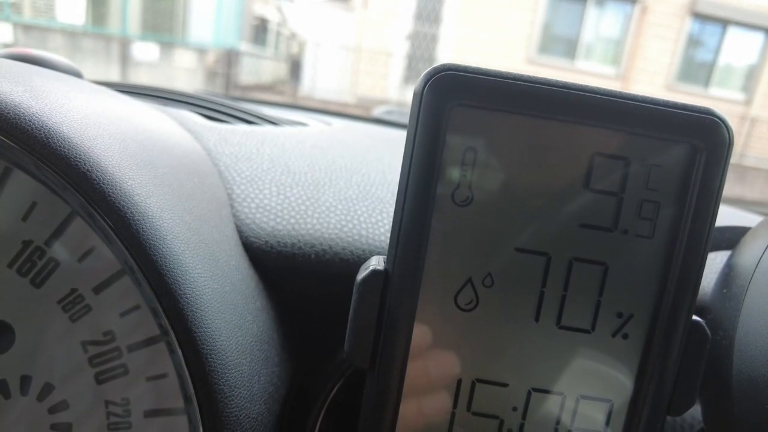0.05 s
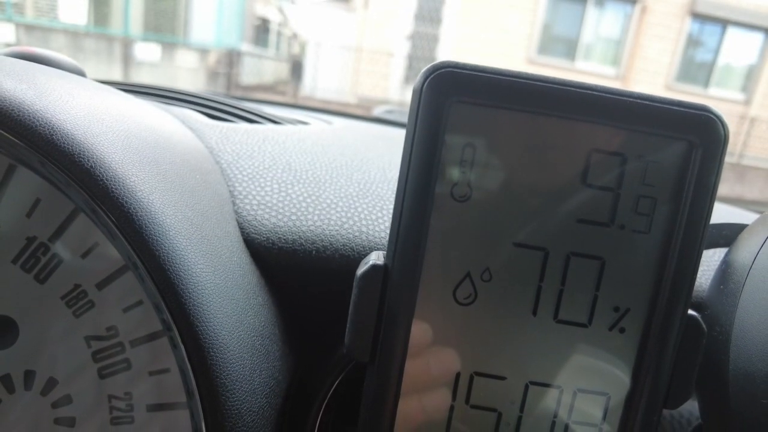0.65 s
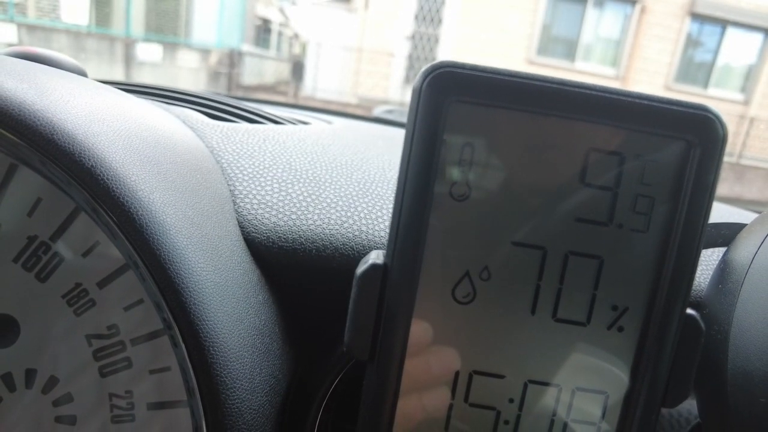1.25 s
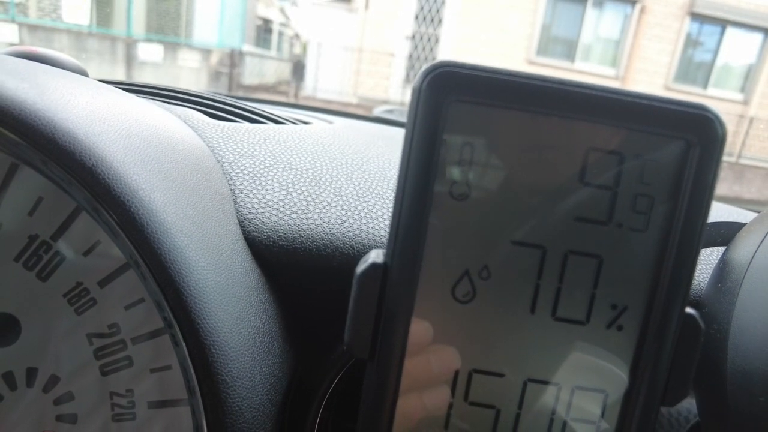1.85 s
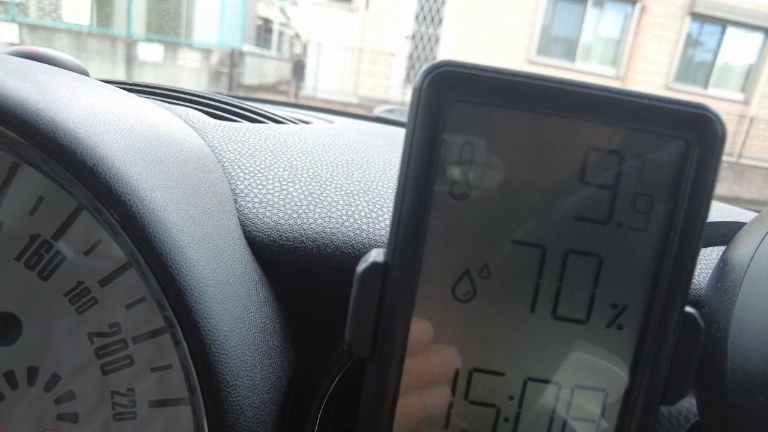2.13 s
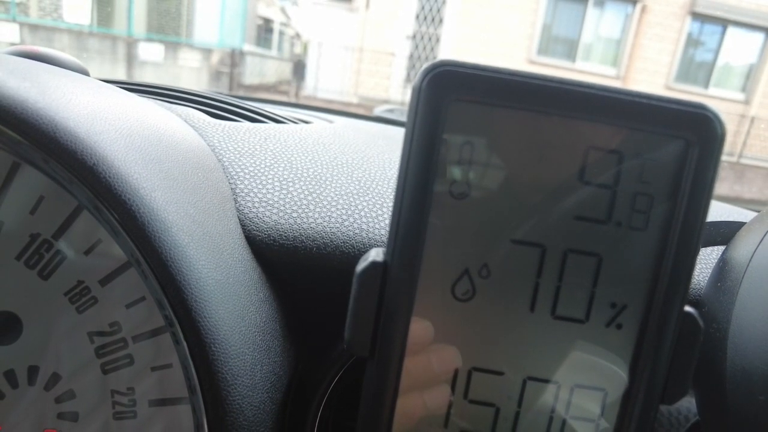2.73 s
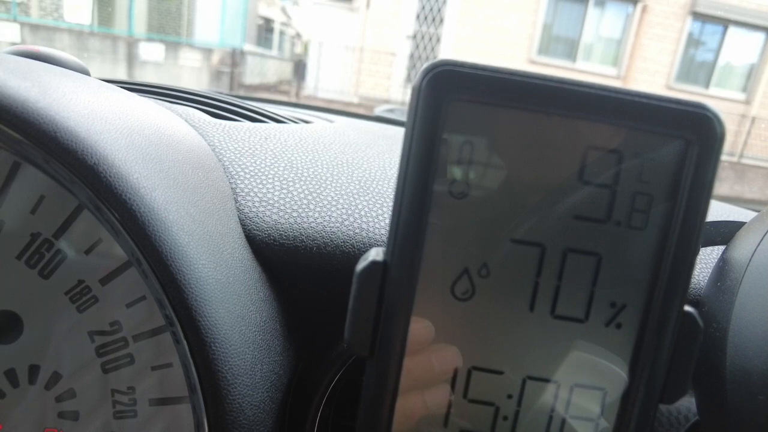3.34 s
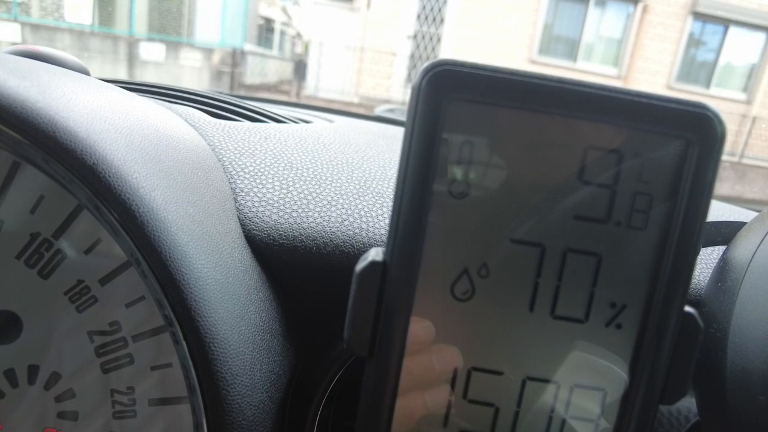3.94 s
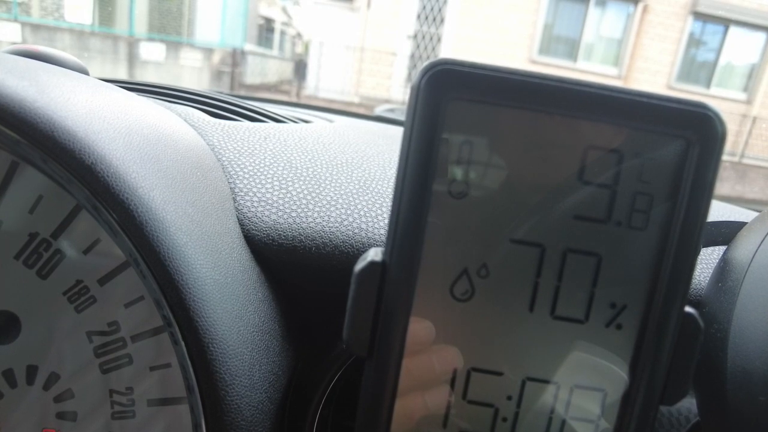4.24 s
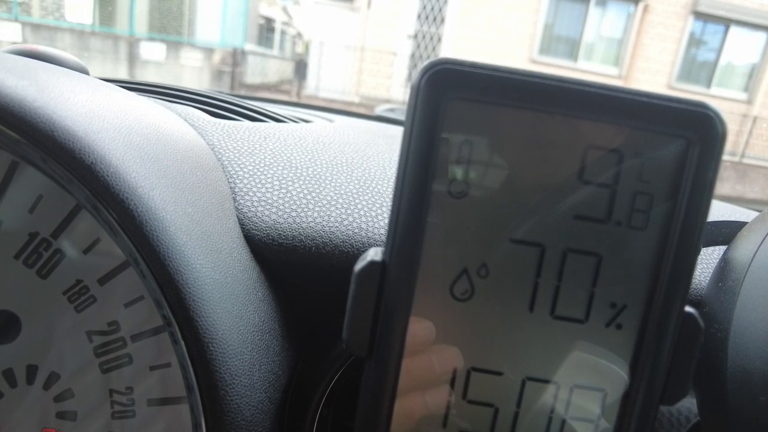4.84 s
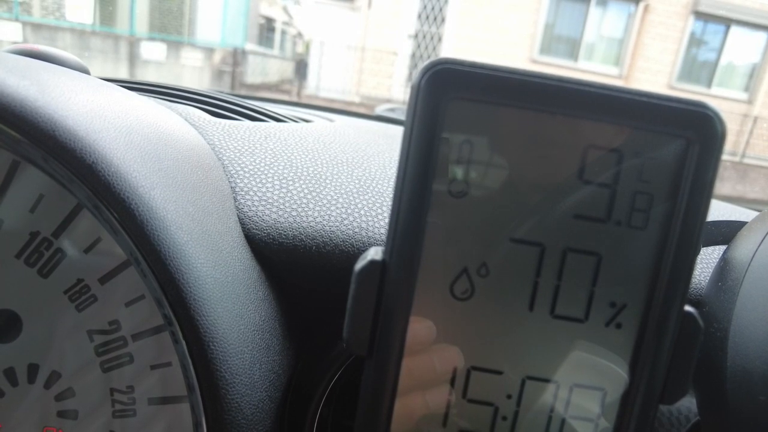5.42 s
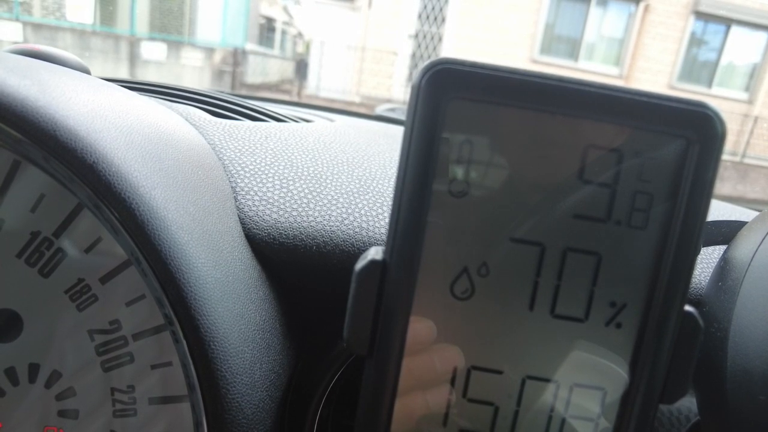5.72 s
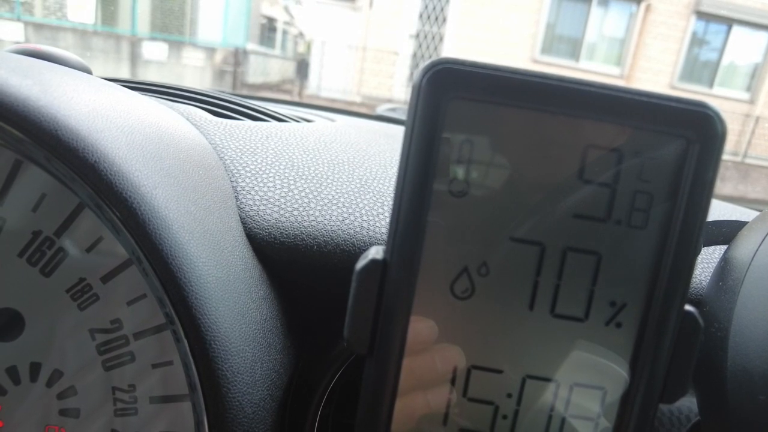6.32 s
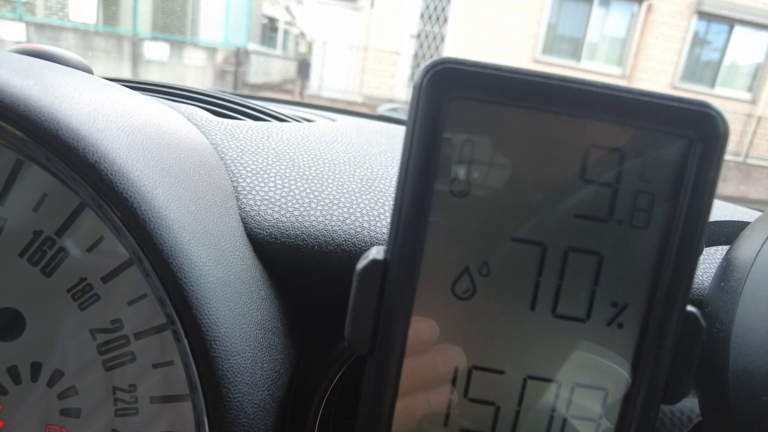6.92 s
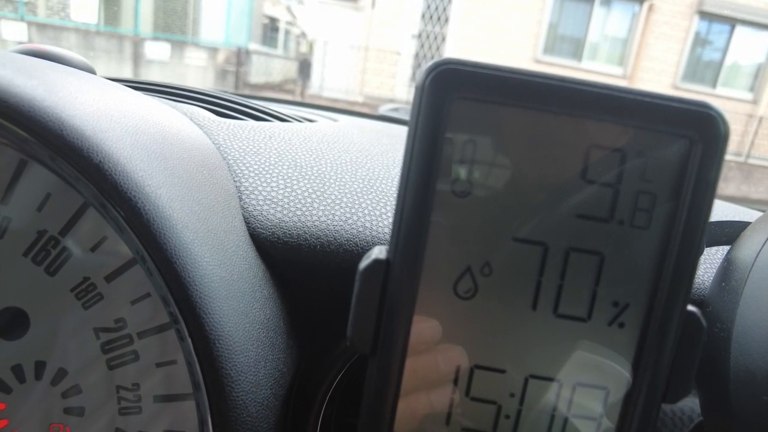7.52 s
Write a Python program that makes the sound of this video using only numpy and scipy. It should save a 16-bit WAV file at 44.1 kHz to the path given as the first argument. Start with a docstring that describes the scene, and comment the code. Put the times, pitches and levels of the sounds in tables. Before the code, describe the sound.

Steady air rushes and hisses from car vents, softly buffeting the microphone over the hum of the blower and idling engine.

```python
"""The air-conditioning blower of a parked car runs steadily, heard from close to the dashboard.
From the start, turbulent air rushes through resonant ducts into the cabin, its draught buffets the
microphone and the grilles hiss; beneath lie the blower's hum and the low note of the idling engine.
From about half a second on, gusts and soft, low thumps come and go in the rumble as the draught builds
slightly. Near six seconds the trim gives one faint tick, and the air runs on."""
import sys
import numpy as np
from scipy import signal
from scipy.fft import rfft, irfft, next_fast_len
from scipy.io import wavfile
from scipy.ndimage import uniform_filter1d

SR = 44100
rng = np.random.default_rng(int(sys.argv[2]) if len(sys.argv) > 2 else 0)


def file_out(sig):
    """Save sig as 16-bit WAV at sys.argv[1]."""
    # one column per channel
    cols = np.atleast_2d(sig).T
    # limit, then scale
    lim = np.clip(cols, -1, 1)
    pcm = np.round(lim * 32767).astype(np.int16)
    wavfile.write(sys.argv[1], SR, pcm)


N = 338247

# Spectrum of the air in the ducts: frequency_hz, relative_db
DUCT_SPECTRUM = [(10, -33), (24, -13), (60, -2.5), (160, -2), (300, -2), (430, -3.5), (480, -11),
                 (800, -8.5), (1050, -10), (1350, -14.5), (1550, -23), (1950, -23), (2150, -27.5),
                 (2950, -29.5), (3110, -34.5), (3330, -48.5), (4500, -87)]
# Resonances and dips of the ducts and cabin: centre_hz, width_hz, gain_db
CABIN_MODES = [(185, 15, 2.5), (204.4, 19, 6), (258, 30, -1), (285, 24, 4), (324, 27, -2), (355, 15, 2.5),
               (374.5, 7.1, -3), (394, 13, 1), (422, 21, 2.5), (504, 55, 2), (566, 34, -3), (609, 14, 3.5),
               (882, 24, -2), (1084, 32, -7.5), (1136, 60, 2), (1225, 40, -2), (1435, 29, -2.5),
               (1502, 66, 4.5), (1624, 36, 4.5), (1718, 55, 5), (1790, 25, -1), (2320, 99, 4)]
# Spectrum of the draught on the microphone: frequency_hz, relative_db
BUFFET_SPECTRUM = [(8, -33), (15, -10), (26, 0), (45, -1.5), (70, 1), (90, 1.5), (138, -2.5), (165, -15),
                   (260, -17.5), (500, -67), (2000, -100)]
# Spectrum of the hiss at the grilles: frequency_hz, relative_db
GRILLE_SPECTRUM = [(2000, -25), (3000, -6), (3250, 4.5), (3500, 2.2), (3700, 0), (4300, .5), (5400, -1.8),
                   (7000, -5.7), (8600, -9.5), (10200, -12), (13000, -15.3), (15700, -14.6)]
# Bright bands in the hiss: centre_hz, width_hz, gain_db
GRILLE_BANDS = [(4360, 600, 7.4), (6200, 500, 3.3), (7830, 740, 11), (9340, 780, 12), (10780, 480, 4),
                (12370, 780, 10.5)]
# Tones of the blower: pitch_hz, level_db, pitch_waver_ratio
BLOWER_TONES = [(202.5, -54.5, 0.0117), (333, -56, 0.0028), (389.8, -49, 0.0024)]
# Thin whine of the blower's motor: pitch_hz, level_db, pitch_waver_ratio
MOTOR_WHINE = [(1999, -70.5, 0.002)]
# Tones of the idling engine: pitch_hz, level_db, pitch_waver_ratio
ENGINE_TONES = [(28.1, -47, 0.0063), (52.75, -41, 0.0034)]
# Gusts and lulls in the draught: middle_s, length_s, lift_db
GUSTS_AND_LULLS = [(0.61, .12, 5), (.87, .22, 1), (1.36, 0.22, 3.5), (1.544, 0.12, 1.5), (1.81, 0.16, 5),
                   (2.04, 0.15, 5.5), (2.17, .14, -3), (2.655, 0.28, 3.5), (2.783, .15, -7.5),
                   (3.12, 0.58, 3), (3.353, .1, -1), (3.47, .16, -1.5), (3.753, 0.25, -1.5),
                   (4.02, 0.4, 1.5), (4.307, .12, 5), (4.682, 0.19, 3), (5.676, .22, 3),
                   (5.873, 0.11, -1.5), (6.22, 0.2, 6), (6.43, 0.13, 0.5), (6.67, 0.11, 3.5),
                   (6.933, 0.13, 5.5), (7.09, .28, 4.2)]
# The loudest soft, low thumps in the rumble: middle_s, peak_db, centre_hz, direction (push 1, suction -1)
LOW_THUMPS = [(.604, -23, 80, -1), (1.258, -20.5, 90, 1), (2.018, -19, 70, 1), (2.626, -16.5, 75.5, -1),
              (3.059, -19, 80, 1), (3.351, -20, 99, 1), (3.951, -19, 71, -1), (4.007, -19.5, 90, -1),
              (4.084, -17.5, 100, -1), (4.478, -18, 94, -1), (4.545, -18.5, 85, -1), (4.655, -16, 121, -1),
              (5.681, -18.5, 70.6, -1), (6.269, -20, 84, -1), (6.668, -19.5, 75, 1), (7.051, -16, 85, -1),
              (7.55, -16.5, 70, 1)]
# Modes of the trim: pitch_hz, relative_db, t60_s
TRIM_MODES = [(420, -4, .012), (820, -2, .009), (1150, -3, .008)]

BAND_EDGE_HZ = 15750


def gain_of(db):
    """Amplitude grows tenfold for every 20 dB."""
    return 10 ** (np.asarray(db) / 20)


def unit_rms(x):
    """Normalisation to a mean power of 1."""
    return x / np.sqrt(np.mean(x ** 2) + 1e-20)


def response(hz, spectrum, modes=(), order=2):
    """Frequency response: a smooth curve with bell-shaped peaks and dips, steeper at higher order."""
    points_hz, points_db = np.transpose(spectrum)
    level_db = np.interp(np.log(hz + 1), np.log(points_hz + 1), points_db)
    for centre_hz, width_hz, gain_db in modes:
        level_db = level_db + gain_db * .5 ** (abs(2 * (hz - centre_hz) / width_hz) ** order)
    return gain_of(level_db)


def shaped(x, spectrum, modes=(), order=2):
    """Linear filtering: the spectrum of x is multiplied by a response; the result has rms 1."""
    size = next_fast_len(N)
    gain = response(np.fft.rfftfreq(size, 1 / SR), spectrum, modes, order)
    return unit_rms(irfft(rfft(x, size) * gain, size)[:N])


def wander(top_hz):
    """Superposed slow sines of random phase make an irregular drift of rms 1."""
    t = np.arange(0, N / SR, 1 / 500)
    rates_hz = top_hz * np.geomspace(1 / 10, 1, num=24)
    drift = sum(np.sin(2 * np.pi * (hz * t + rng.random())) for hz in rates_hz)
    return unit_rms(np.interp(np.arange(N) / SR, t, drift))


def duct_rush(level_db=-34.5, swell_db=0.44, drone_top_hz=450, gust_share=0.2):
    """Resonance: broadband turbulence rings the ducts and cabin, and gusts lift the low drone."""
    air = shaped(rng.standard_normal(N), DUCT_SPECTRUM, CABIN_MODES)
    drone = signal.sosfiltfilt(signal.butter(4, drone_top_hz, fs=SR, output="sos"), air)
    gusting_air = air - drone + drone * gain_of(gust_share * gust_lift_db())
    return gain_of(level_db + swell_db * wander(top_hz=4)) * gusting_air


def draught_buffet(eddies_per_s=60, eddy_share=0.23, start_db=-33, build_db_per_s=0.26, unrest_db=-0.35):
    """Turbulent pressure: fine fluctuations and single eddies push on the microphone as a rumble."""
    fine = shaped(rng.standard_normal(N), BUFFET_SPECTRUM)
    # the core of each passing eddy is a brief suction
    arrivals = rng.random(N) < eddies_per_s / SR
    eddies = shaped(arrivals * -abs(rng.standard_normal(N)), BUFFET_SPECTRUM)
    pressure = np.sqrt(1 - eddy_share) * fine + np.sqrt(eddy_share) * eddies
    # chance swells are evened out, so the slow rise and fall follows the draught's strength
    slow_power = uniform_filter1d(uniform_filter1d(pressure ** 2, size=7000), size=2000)
    pressure = unit_rms(pressure / np.sqrt(slow_power))
    build_db = build_db_per_s * np.arange(N) / SR
    strength_db = start_db + build_db + unrest_db * wander(top_hz=9) + gust_lift_db()
    return pressure * gain_of(strength_db)


def grille_hiss(level_db=-63.1, flicker_db=15, peak_bias=1.45, valley_bias=0.66, thinning=0.62):
    """Hiss at the grilles, and above it the treble flickers in patches: random amplitude modulation."""
    hz, _, noise = signal.stft(rng.standard_normal(N), SR, nperseg=512, noverlap=384)
    patches = rng.standard_normal(noise.shape[::-1]).T
    for bins, frames in ((11, 6), (6, 4)):
        patches = uniform_filter1d(uniform_filter1d(patches, bins, axis=0), frames, axis=1)
    # the flicker is local: its broad swells across frequency are weak
    patches = unit_rms(patches - 0.6 * uniform_filter1d(patches, size=90, axis=0))
    # it holds steadier in the bright bands and grows sparser toward the top
    bright_bands = response(hz, GRILLE_SPECTRUM, GRILLE_BANDS, order=8) / response(hz, GRILLE_SPECTRUM)
    bias = peak_bias * np.log(bright_bands) - valley_bias - thinning * (hz / BAND_EDGE_HZ) ** 2
    flicker = gain_of(flicker_db * np.tanh(6 * (patches + bias[:, None])))
    flicker /= np.sqrt(np.mean(flicker ** 2, axis=1, keepdims=True))
    air = signal.istft(noise * flicker, SR, nperseg=512, noverlap=384)[1][:N]
    return gain_of(level_db) * shaped(air, GRILLE_SPECTRUM, GRILLE_BANDS, order=8)


def machine_hum(tones, flutter_db):
    """Rotation radiates tones; wavering speed and load modulate their frequency and amplitude."""
    speed_drift, hum = wander(top_hz=5), np.zeros(N)
    for pitch_hz, level_db, waver_ratio in tones:
        cycles = np.cumsum(pitch_hz * (1 + waver_ratio * speed_drift)) / SR + rng.random()
        flutter = gain_of(flutter_db * wander(top_hz=10))
        hum += gain_of(level_db) * unit_rms(np.sin(2 * np.pi * cycles) * flutter)
    return hum


def gust_lift_db():
    """Flow noise follows flow strength: each gust or lull is a symmetric rise or dip in level."""
    t = np.arange(N) / SR
    return sum(lift_db * np.cos(np.pi * np.clip((t - middle_s) / length_s, -.5, .5)) ** 2
               for middle_s, length_s, lift_db in GUSTS_AND_LULLS)


def with_low_thumps(rumble):
    """Pressure pulses: the rumble is turned down briefly under each soft, low thump."""
    t = np.arange(N) / SR
    for middle_s, peak_db, centre_hz, direction in LOW_THUMPS:
        offset_squared = np.minimum((np.pi * centre_hz * (t - middle_s)) ** 2, 20)
        # one push or suction between two weaker opposite swings
        pulse = np.sign(direction) * (1 - 2 * offset_squared) * np.exp(-offset_squared)
        ducking = 1 - np.exp(-offset_squared / 2)  # keeps the noise from cancelling the pulse
        rumble = rumble * ducking + gain_of(peak_db) * pulse
    return rumble


def trim_tick(start_s=6.0395, gain_db=-20, rise_s=0.00078):
    """Damped free vibration: one small, dull tick, probably of plastic trim."""
    age_s = np.clip(np.arange(N) / SR - start_s, 0, 1)
    ring = sum(gain_of(relative_db - 60 * age_s / t60_s) * np.sin(2 * np.pi * pitch_hz * age_s)
               for pitch_hz, relative_db, t60_s in TRIM_MODES)
    attack = 1 - np.exp(-(age_s / rise_s) ** 2)
    return gain_of(gain_db) * attack * ring


def scene(hum_swell_db=2.4):
    """Superposition: air and machinery add at one microphone; the blower's hum swells and sinks."""
    blower = machine_hum(BLOWER_TONES + MOTOR_WHINE, flutter_db=2.5)
    blower *= gain_of(hum_swell_db * wander(top_hz=1.4))
    engine = machine_hum(ENGINE_TONES, flutter_db=-1.5)
    air = duct_rush() + with_low_thumps(draught_buffet()) + grille_hiss()
    return (air + blower + engine + trim_tick())[None]


def record(dry):
    """Band limiting: a steep low-pass filter removes the highest treble."""
    lowpass = signal.firwin(1023, BAND_EDGE_HZ, window=("kaiser", 9), fs=SR)
    return signal.oaconvolve(dry, lowpass[None], "same")


dry = scene()
out = record(dry)
file_out(out)
```